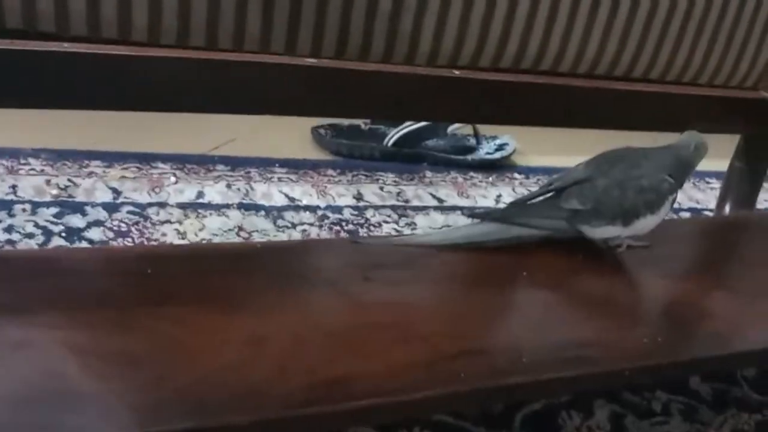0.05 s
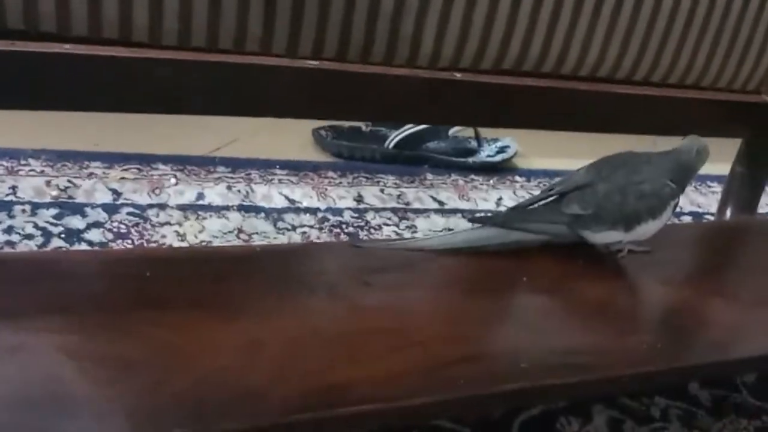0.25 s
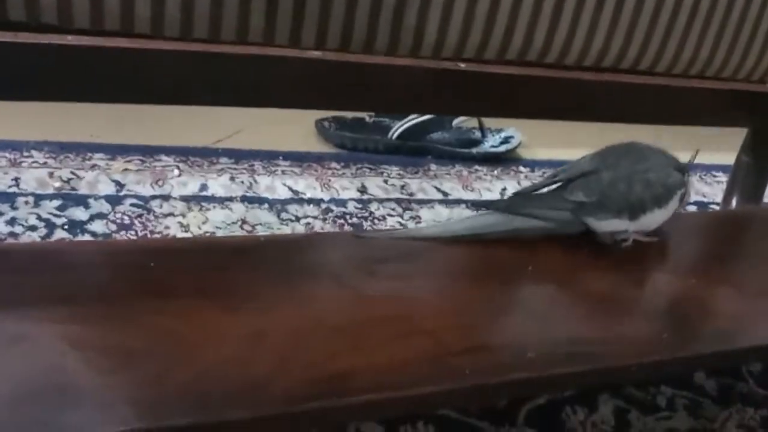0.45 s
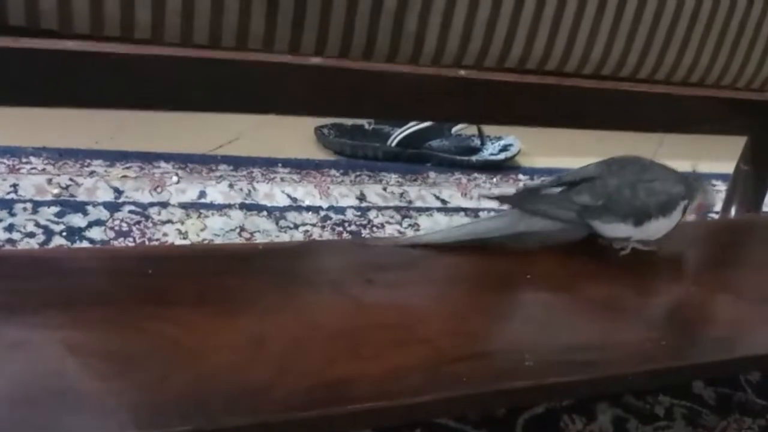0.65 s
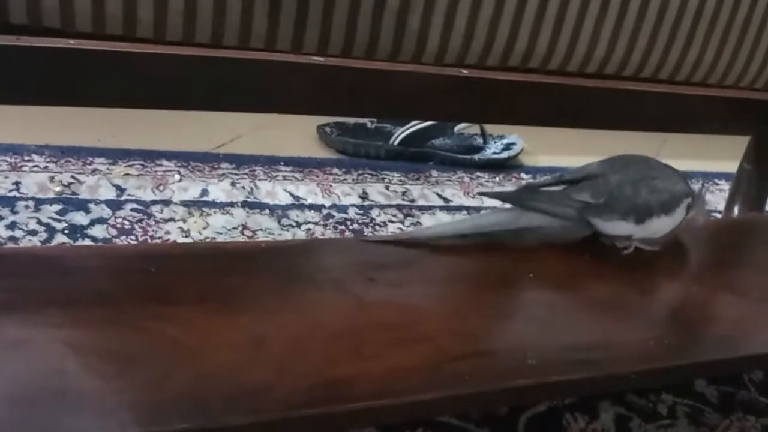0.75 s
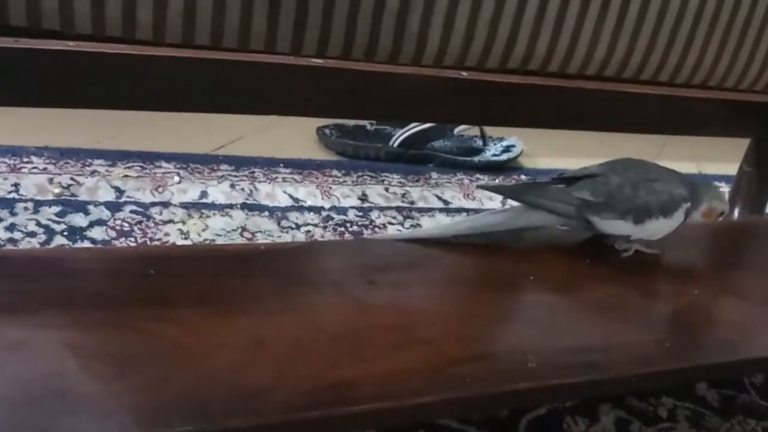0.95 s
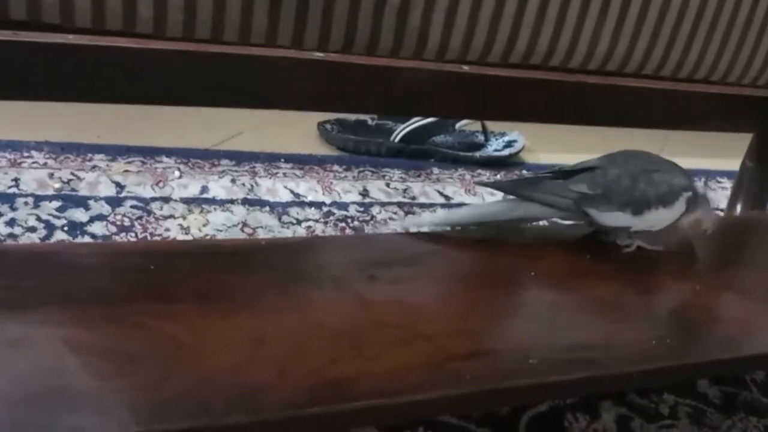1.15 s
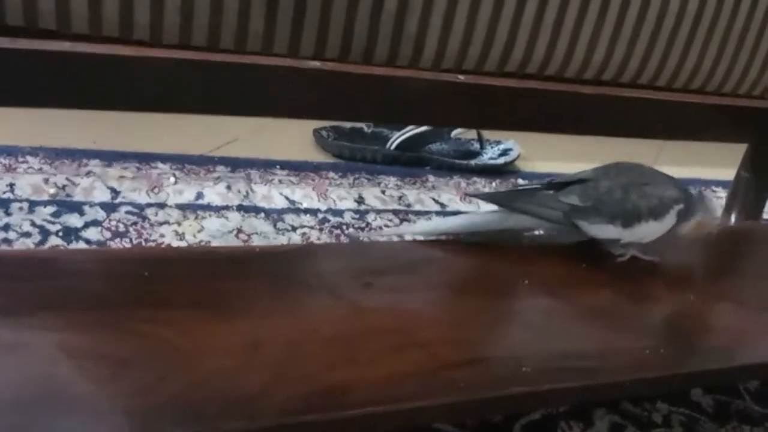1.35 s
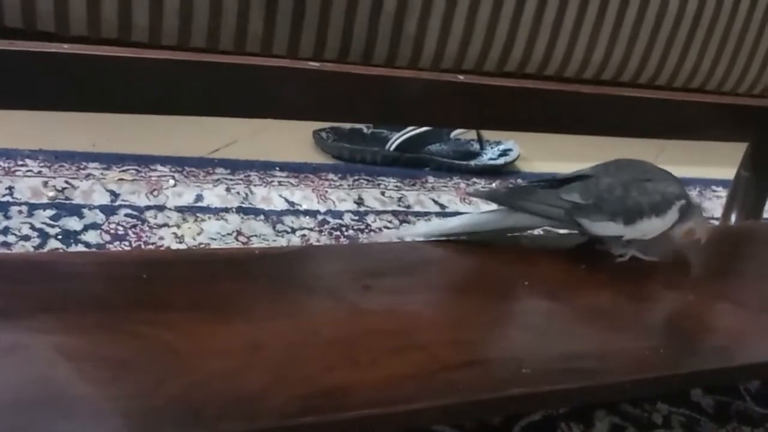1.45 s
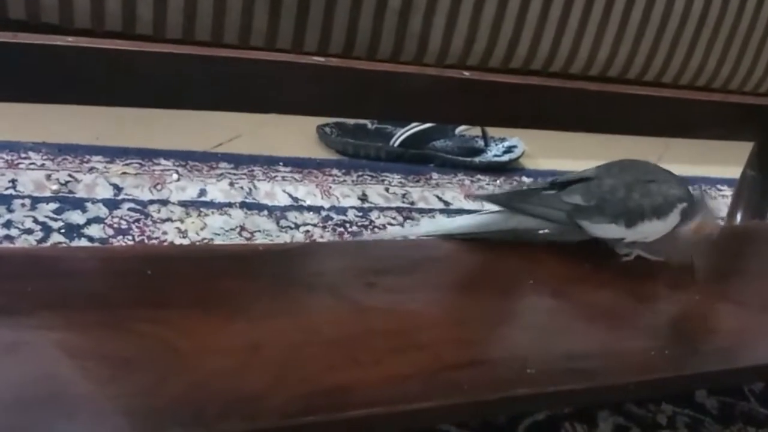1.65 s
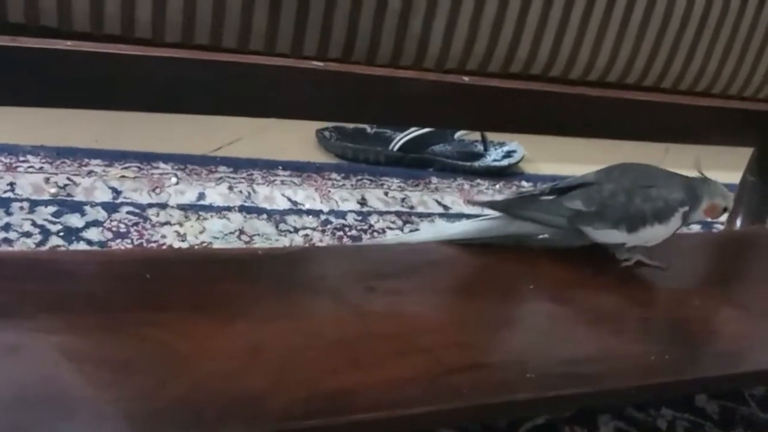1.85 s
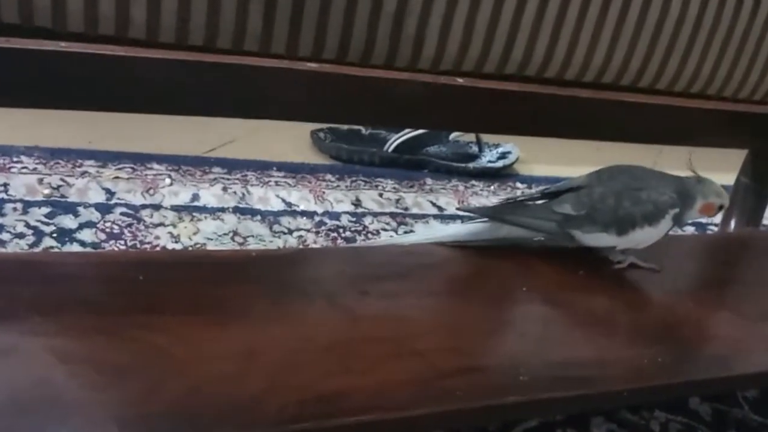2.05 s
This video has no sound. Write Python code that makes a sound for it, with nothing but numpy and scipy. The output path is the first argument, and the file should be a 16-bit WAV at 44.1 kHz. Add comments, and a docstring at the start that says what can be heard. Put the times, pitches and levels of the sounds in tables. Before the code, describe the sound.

Quick beak taps and dull knocks on wood as a pet bird pecks indoors.

```python
"""Dull knocks ring through polished wooden furniture as a small bird drums on it with its beak.
Each impact excites the damped normal modes of the whole board. Hard, bright taps soon fall between
the knocks and then go on alone, each coloured by the modes that its point of contact can excite.
The quiet room reverberates briefly, over a faint low rumble, a drone and a thin hiss."""
import sys
import numpy as np
from scipy import signal
from scipy.fft import rfft, irfft
from scipy.io import wavfile

SR = 44100
rng = np.random.default_rng(int(sys.argv[2]) if len(sys.argv) > 2 else 0)


def wrap_up_sound(samples):
    """Save the sound to the file named by the first command line argument, as 16-bit audio."""
    columns = np.atleast_2d(samples).T
    # keep every value between -1 and 1, then stretch to whole-number steps
    tamed = np.clip(columns, -1, 1)
    steps = np.round(tamed * 32767).astype(np.int16)
    wavfile.write(sys.argv[1], SR, steps)


N = 92610

# Levels in the tables are relative; t60_s is the time a vibration takes to fall by 60 dB.
# dull knocks: start_s, bass_db, middle_db, treble_db
KNOCK_BLOWS = [(0.239, -43, -52.5, -46.5), (0.4272, -45.5, -44.5, -43), (0.5818, -45, -43.5, -42.5),
               (0.7238, -47.5, -42, -43), (0.8905, -43.5, -41, -42), (1.0477, -44.5, -44.5, -43.5),
               (1.1956, -49.5, -50, -45.5), (1.3663, -55, -51, -49.5)]
# limits of those three bands: edge_hz
KNOCK_EDGES_HZ = [150, 800, 3300, 12000]
# hard taps: start_s, node_hz, bass_db, low_middle_db, middle_db, ring_db, click_db, treble_db, top_db
TAP_BLOWS = [(0.538, 4400, -62, -68.5, -57, -55, -50, -54.5, -73),
             (0.6458, 4320, -49.5, -47.5, -50, -44, -39, -47, -55.5),
             (0.7872, 3490, -51, -44.5, -53.5, -39.5, -43, -47, -59.5),
             (0.9285, 4040, -57, -44, -56, -41.5, -40.5, -47, -58.5),
             (1.0728, 3660, -53.5, -46.5, -61, -37.5, -45, -50.5, -65.5),
             (1.224, 3660, -54, -46, -58.5, -37.5, -44.5, -46.5, -64),
             (1.3714, 3120, -47.5, -49, -48, -43, -40, -42, -64),
             (1.5223, 2854, -54.5, -49, -49.5, -46, -41.5, -47.5, -64.5),
             (1.6798, 3650, -55.5, -50, -62, -42, -46.5, -51.5, -70)]
# limits of those seven bands: edge_hz
TAP_EDGES_HZ = [300, 1000, 1850, 2400, 3300, 5000, 9000, 16000]
# distinct modes of the board: pitch_hz, level_db, t60_s
BOARD_CLEAR_MODES = [(178.4, 3.5, 0.27), (365.5, -8, 0.067), (474, -1, 0.28), (516.3, 1.5, 0.26),
                     (579, -1, 0.067), (640.4, 4, 0.16), (843, -12, 0.21), (914, -8, .14), (1280, 1.5, 0.3),
                     (1293, -5.5, 0.23), (1580, -0.5, .11), (1780, -1.5, 0.14), (2436, -9, 0.09),
                     (2610, -3.5, 0.05), (4450, -6, 0.11), (5660, -20, 0.22), (6150, -2, 0.09),
                     (6790, -1, .1), (7270, -19, 0.085), (8240, -9, 0.087)]
# overlapping modes of the board: band_hz, level_db, t60_s
BOARD_DENSE_MODES = [(112, -10, 0.29), (266, -2.5, 0.19), (620, 1, 0.093), (990, 1, 0.29), (1870, 1, 0.035),
                     (3360, -6, 0.094), (5670, 3, 0.068), (7300, -2.5, 0.049), (9720, -16.5, 0.078),
                     (13400, -31, .05)]
# modes of the hard spot under the beak: pitch_hz, level_db, t60_s, after_ring_db
SPOT_MODES = [(895, -13, 0.079, -22.5), (1216, -10, 0.059, -34), (1378, -11.5, 0.095, -23),
              (1707, -8.5, 0.039, -21), (2177, -13, 0.022, -32), (2593, -13, 0.072, -24),
              (2703, 3, 0.11, -11.5), (3063, -2, 0.047, -20), (3274, -4.5, 0.026, -14.5),
              (3635, 0, 0.025, -13.5), (3902, -3, 0.041, -22), (3958, -5, 0.056, -14),
              (4080, -36, 0.036, -16.5), (4660, -11, .05, -20), (4900, -12.5, 0.046, -26),
              (5890, -12, .03, -23)]
# crack of the beak: band_hz, level_db, t60_s
BEAK_CRACK = [(247, -24, 0.039), (547, -15, 0.072), (840, -11, 0.043), (1440, -1.5, 0.048),
              (2000, -7.5, 0.054), (2950, 1, 0.058), (3980, 3, 0.026), (5800, -10, 0.027),
              (7700, -8, 0.019), (10200, -9.5, 0.017), (13900, -25, .02)]
# room reverberation after a knock: band_hz, level_db, t60_s
KNOCK_REVERB = [(150, -6, 0.97), (540, 2.5, 0.37), (1240, 2.5, 0.29), (3420, -8, 0.51), (5550, -0.5, 0.26),
                (7600, -5.5, 0.28), (11650, -26, 0.31), (15000, -38, .15)]
# room reverberation after a tap: band_hz, level_db, t60_s
TAP_REVERB = [(189, -14, 0.35), (556, -10, .33), (1330, -5, 0.36), (1990, -10.5, 0.23), (2860, -4.5, 0.38),
              (4100, -6, 0.37), (6000, -14, 0.32), (9200, -18, 0.37), (14200, -24, .15)]
# stereo balance of the board: frequency_hz, left_minus_right_db
BOARD_BALANCE = [(200, 1.5), (600, 0.5), (1300, 0), (2700, 3), (4200, 2), (6300, 6), (8200, -7),
                 (10000, -2), (13000, -1)]
# spectral density of the rumble: frequency_hz, level_db
RUMBLE_SPECTRUM = [(20, -37), (35, -45), (50, -22), (70, -14.5), (100, 3), (130, -4.5), (200, -20.5),
                   (400, -47.5)]
# wavering of the rumble, before scaling by RUMBLE_DEPTH: time_s, level_db
RUMBLE_CONTOUR = [(0.0, -61), (0.29, -66), (0.33, -55.5), (0.61, -60), (0.65, -61), (0.68, -69),
                  (0.73, -66), (0.78, -48.5), (0.89, -64.5), (0.97, -49.5), (1.05, -64.5), (1.27, -55.5),
                  (1.34, -79.5), (1.42, -63.5), (1.84, -56.5), (1.88, -78), (1.93, -57), (2.1, -66)]
# spectral density of the drone: frequency_hz, level_db
DRONE_SPECTRUM = [(80, -47.5), (140, 0.5), (185, 1), (240, -1.5), (320, -19.5), (385, -2.5), (460, -14),
                  (560, -3.5), (660, -16), (1000, -31), (2000, -46)]
# spectral density of the hiss: frequency_hz, level_db
HISS_SPECTRUM = [(300, 10.5), (1300, -8), (2800, -5.5), (4200, -0.5), (5400, 3.5), (6750, 5.5), (7400, -5),
                 (9000, -12.5), (10700, -10), (12500, -15.5), (16000, -17)]

KNOCK_RISE_S, TAP_RISE_S, ROOM_RISE_S = 0.0012, 0.00057, 0.0099
BOARD_MODES_DB, SPOT_MODES_DB, AFTER_RING_T60_S = -4.5, 2.5, 0.38
MODE_SPREAD_RAD, MONO_BELOW_HZ = 1.38, 390
RUMBLE_DEPTH = 0.62
RING_T = np.arange(SR // 2) / SR


def knocks():
    """Impact excitation: a dull blow sets the whole board vibrating freely, and the room reverberates."""
    out = np.zeros((2, N))
    ringing = amp(BOARD_MODES_DB) * damped_modes(BOARD_CLEAR_MODES, KNOCK_RISE_S)
    sounds = impulse_responses(ringing, BOARD_DENSE_MODES, KNOCK_RISE_S, KNOCK_REVERB,
                               variation=0.36, count=len(KNOCK_BLOWS))
    for (start_s, *levels_db), sound in zip(KNOCK_BLOWS, sounds):
        add(out, start_s, shape_blow(sound, KNOCK_EDGES_HZ, levels_db))
    return out * amp(-1) * pan(left_minus_right_db=-2.5)


def taps():
    """A brief, hard contact excites high modes: the beak cracks on the wood and leaves a bright ring."""
    out = np.zeros((2, N))
    lingering = [(hz, after_ring_db, AFTER_RING_T60_S) for hz, _, _, after_ring_db in SPOT_MODES]
    spot = damped_modes(SPOT_MODES, TAP_RISE_S) + damped_modes(lingering, ROOM_RISE_S)
    ringing = amp(SPOT_MODES_DB) * spot + contact_pulse()
    sounds = impulse_responses(ringing, BEAK_CRACK, TAP_RISE_S, TAP_REVERB,
                               variation=0.5, count=len(TAP_BLOWS))
    for (start_s, node_hz, *levels_db), sound in zip(TAP_BLOWS, sounds):
        add(out, start_s, shape_blow(node_notch(sound, node_hz), TAP_EDGES_HZ, levels_db))
    return out * pan(left_minus_right_db=-2)


def contact_pulse(gain_db=-3.5, width_s=0.00005):
    """The first touch of the beak radiates one bipolar pressure pulse, the derivative of a Gaussian."""
    u = RING_T / width_s - 2 * np.pi  # delayed so that the whole pulse fits
    return amp(gain_db) * unit_energy(u * np.exp(-u ** 2 / 2))


def node_notch(sound, node_hz, depth=0.91, width_hz=1120):
    """A mode struck at its node is barely excited, so a band around node_hz is weakened."""
    b, a = signal.iirpeak(node_hz, node_hz / width_hz, SR)
    return sound - depth * signal.lfilter(b, a, sound)


def impulse_responses(ringing, dense_bands, rise_s, reverb_bands, variation, count):
    """Superposition: each blow is the same ringing plus a diffuse part that varies a little."""
    def diffuse():
        return diffuse_decay(dense_bands, rise_s) + diffuse_decay(reverb_bands, ROOM_RISE_S)

    shared = diffuse()
    return [ringing + (shared + variation * diffuse()) / np.hypot(1, variation) for _ in range(count)]


def damped_modes(table, rise_s):
    """Normal modes ring as damped sinusoids; the higher ones arrive left and right out of phase."""
    out = 0
    for (hz, level_db, t60_s, *_), start_cycles in zip(table, rng.random(len(table))):
        lead_rad = np.array([[MODE_SPREAD_RAD], [0]]) * hz ** 2 / (hz ** 2 + MONO_BELOW_HZ ** 2)
        sine = np.sin(2 * np.pi * (hz * RING_T + start_cycles) + lead_rad)
        out = out + amp(level_db) * unit_energy(sine * envelope(rise_s, t60_s))
    return out


def diffuse_decay(bands, rise_s):
    """Densely overlapping modes or echoes merge into noise, each band decaying at its own rate."""
    out = 0
    centres_hz = [band[0] for band in bands]
    for (_, level_db, t60_s), this_band in zip(bands, np.eye(len(bands))):
        hz, spectra = noise_pair(len(RING_T))
        high_pass = hz ** 2 / (hz ** 2 + (centres_hz[0] / 2) ** 2)
        noise = irfft(spectra * curve_at(hz, centres_hz, this_band) * high_pass, len(RING_T))
        out = out + amp(level_db) * unit_energy(noise * envelope(rise_s, t60_s))
    return out


def envelope(rise_s, t60_s):
    """A vibration builds quickly, then damping makes it decay exponentially."""
    return (1 - np.exp(-RING_T / rise_s)) * np.exp(-np.log(1000) * RING_T / t60_s)


def shape_blow(sound, edges_hz, levels_db, attack_s=0.025, size=4096):
    """A causal, minimum-phase filter brings each band of a blow's attack towards its given level."""
    hz = np.fft.rfftfreq(size, 1 / SR)
    count = round(attack_s * SR)
    power = (abs(rfft(sound[:, :count], size)) ** 2).mean(0) * 2 / (size * count)
    lows, highs = np.array(edges_hz[:-1]), np.array(edges_hz[1:])
    band_power = [power[(hz >= low) & (hz < high)].sum() for low, high in zip(lows, highs)]
    gain_db = np.array(levels_db) - 10 * np.log10(band_power)
    two_sided_hz = abs(np.fft.fftfreq(size, 1 / SR))
    log_gain = np.log(amp(curve_at(two_sided_hz, np.sqrt(lows * highs), gain_db)))
    minimum_phase = np.exp(signal.hilbert(log_gain).conj())
    kernel = np.fft.ifft(minimum_phase).real[:size // 2]
    return signal.fftconvolve(sound, kernel[None], axes=1)


def pan(left_minus_right_db):
    """A level difference between the channels places a source to one side."""
    return amp(np.array([[left_minus_right_db], [-left_minus_right_db]]) / 2)


def stereo_balance(sound):
    """The level difference depends on frequency: parts of the treble favour the left, others the right."""
    lean_db = curve_at(np.fft.rfftfreq(N, 1 / SR), *np.transpose(BOARD_BALANCE))
    gains = np.sqrt(2 / (1 + amp(np.array([-lean_db, lean_db])) ** 2))
    return irfft(rfft(sound) * gains, N)


def rumble():
    """Slow amplitude modulation makes a low noise waver."""
    contour_db = np.interp(np.arange(N) / SR, *np.transpose(RUMBLE_CONTOUR))
    wavering = amp(RUMBLE_DEPTH * (contour_db - contour_db.mean()))
    return room_noise(RUMBLE_SPECTRUM, level_db=-60) * wavering


def room_noise(spectrum, level_db):
    """Stationary noise takes its colour from its spectral density."""
    hz, spectra = noise_pair(N)
    colour = amp(curve_at(hz, *np.transpose(spectrum)))
    return amp(level_db) * np.sqrt(N) * unit_energy(irfft(spectra * colour, N))


def noise_pair(size):
    """Noise spectra at two points of a diffuse field: coherent in the bass, unrelated in the treble."""
    hz = np.fft.rfftfreq(size, 1 / SR)
    left, independent = rfft(rng.standard_normal((2, size)))
    correlation = 1 / (1 + (hz / MONO_BELOW_HZ) ** 2)
    right = correlation * left + np.sqrt(1 - correlation ** 2) * independent
    return hz, np.array([left, right])


def amp(db):
    """Decibels as an amplitude ratio."""
    return 10 ** (np.asarray(db) / 20)


def unit_energy(sound):
    """Normalises each channel to an energy of one."""
    return sound / np.sqrt((sound ** 2).sum(-1, keepdims=True) + 1e-20)


def curve_at(hz, points_hz, values):
    """Interpolates along a logarithmic frequency axis."""
    return np.interp(np.log(hz + 1), np.log(points_hz), values)


def add(mix, start_s, sound):
    """Superposes a sound on the mix from start_s onwards."""
    part = mix[:, round(start_s * SR):][:, :sound.shape[1]]
    part += sound[:, :part.shape[1]]


def scene():
    """Sound pressures add: the drumming lies over the rumble, drone and hiss of the room."""
    drumming = stereo_balance(knocks() + taps())
    low_rumble = rumble()
    drone = room_noise(DRONE_SPECTRUM, level_db=-61.5)
    hiss = room_noise(HISS_SPECTRUM, level_db=-64)
    return drumming + low_rumble + drone + hiss


def record(dry):
    """Band limiting: a linear-phase low-pass filter removes the highest treble."""
    low_pass = signal.firwin(511, cutoff=16300, window=("kaiser", 9), fs=SR)
    return signal.oaconvolve(dry, low_pass[None], "same")


dry = scene()
out = record(dry)
wrap_up_sound(out)
```